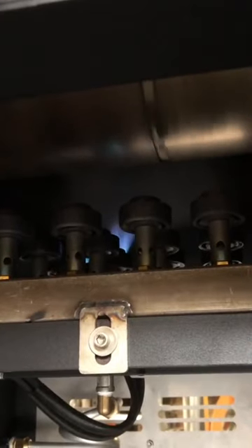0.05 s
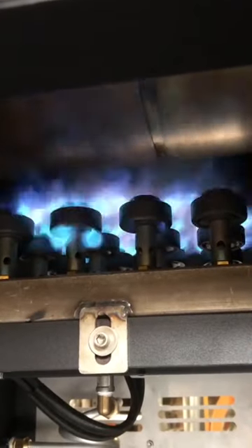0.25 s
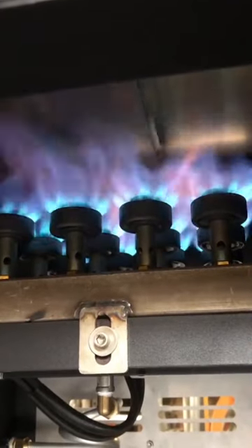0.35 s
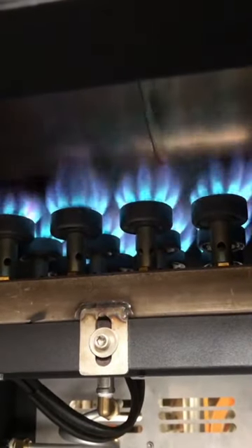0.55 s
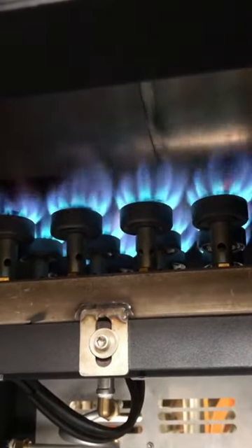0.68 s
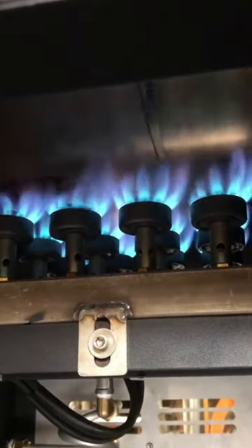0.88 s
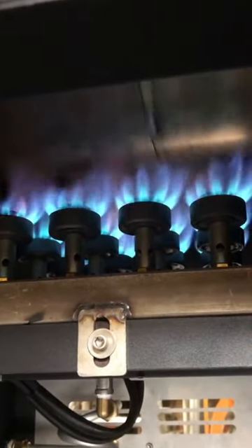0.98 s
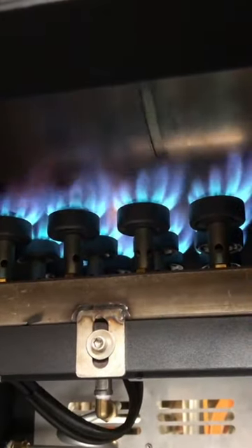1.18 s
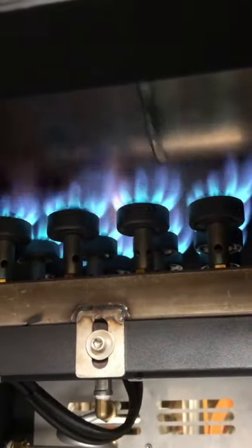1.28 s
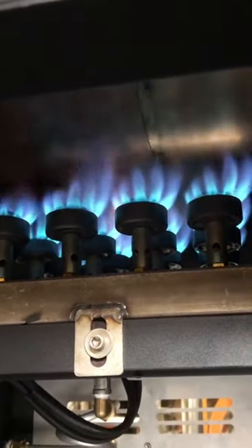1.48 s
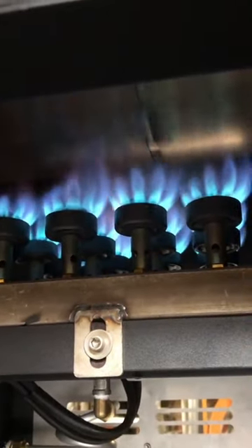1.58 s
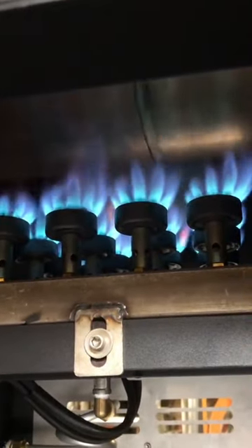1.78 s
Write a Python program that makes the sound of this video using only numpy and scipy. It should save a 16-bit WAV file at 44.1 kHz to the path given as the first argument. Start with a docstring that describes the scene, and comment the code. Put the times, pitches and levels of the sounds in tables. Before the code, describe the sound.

A row of gas burners lights: a hard metallic valve clack with quick chatter, a deep throbbing whoomp with a short hiss, then a fluttering low roar over a steady fan, heard close in a room.

```python
"""A gas valve clacks open in a sheet-metal housing: swelling, dying modes plus dying noise bursts.
A row of burners lights with a whoomp, a rough low throb and a short hiss, and settles to a low roar:
shaped noise boosted at the fire chamber's resonances.
A fan motor runs throughout: steady air noise and slightly unsteady tones."""
import sys
import numpy as np
from scipy import signal
from scipy.fft import rfft, irfft, next_fast_len
from scipy.io import wavfile
from scipy.ndimage import uniform_filter1d, map_coordinates

SR = 44100
rng = np.random.default_rng(int(sys.argv[2]) if len(sys.argv) > 2 else 0)


def store_wav(level_fs):
    """Save 16-bit WAV to argv[1]."""
    pcm = np.round(np.clip(np.atleast_2d(level_fs), -1, 1) * 32767)
    wavfile.write(sys.argv[1], SR, pcm.T.astype(np.int16))


N = 81585  # samples


def valve():
    """Each blow rings the plunger; the first also rings the panels, rattles the housing and echoes in the room."""
    # plunger strike and chatter: (time [s], level [dB])
    blows = [(.1996, 0), (.2085, -8), (.2275, -12), (.2405, -19)]
    # plunger modes: (frequency [Hz], peak before ring gain [dB], time to peak [s], T60 [s])
    plunger_modes = [(5222, -31, .002, .16), (5426, -21, .003, .045), (5590, -14, .003, .02),
                     (6500, -25, .003, .035), (7400, -32, .003, .05)]
    # sheet-metal panel modes: (frequency [Hz], peak before ring gain and onset [dB], time to peak [s], T60 [s])
    panel_modes = [(196, -27, .04, .12), (372, -33, .02, .1), (450, -35, .02, .1), (536, -24, .018, .14),
                   (612, -23.5, .024, .15), (654, -24.5, .022, .2), (765, -23, .009, .12),
                   (824, -24, .011, .16), (923, -17, .033, .035), (983, -23, .022, .1),
                   (1205, -21, .009, .13), (1279, -18, .038, .025), (1380, -18, .004, .09),
                   (1514, -23, .015, .08), (1608, -25, .02, .07), (1690, -25, .016, .1),
                   (1780, -24, .014, .08), (2507, -21, .013, .07), (2580, -42, .07, .2),
                   (2842, -39, .06, .17), (2880, -23, .005, .07), (3005, -38, .07, .14),
                   (3010, -20, .015, .04), (3450, -21, .003, .04), (3750, -23, .003, .035),
                   (5040, -49, .05, .25), (5380, -49, .05, .25), (5540, -47, .07, .2)]
    # rattle spectrum, shared by the room: (frequency [Hz], relative density [dB per Hz])
    rattle_spectrum = [(150, -49.5), (250, -28.5), (675, -3), (1300, 0.5), (2120, -12.5), (2470, -8.5),
                       (4310, -19), (5450, -9.5), (6030, -18), (6560, -13), (14000, -30)]
    # housing decay: (frequency [Hz], T60 [s])
    rattle_t60 = [(400, 0.18), (1200, 0.011), (3000, 0.16), (6000, 0.046), (12000, 0.091)]
    # room decay: (frequency [Hz], T60 [s])
    room_t60 = [(400, 1), (1500, 0.94), (5000, 0.44), (12000, 0.23)]
    rattle_db, room_db, onset_s = -13, -26.5, .002

    out = np.zeros(N)
    plunger = ringing(plunger_modes)
    for time_s, db in blows:
        out[round(time_s * SR):][:SR] += amp(db) * plunger
    rattle = amp(rattle_db) * dying(rattle_spectrum, rattle_t60)
    room = amp(room_db) * dying(rattle_spectrum, room_t60)
    onset = 1 - np.exp(-np.arange(SR) / SR / onset_s)
    clack = (ringing(panel_modes) + rattle + room) * onset
    out[round(blows[0][0] * SR):][:SR] += clack
    return out


def ringing(modes):
    """One second of modes, each swelling to its peak and dying away, wavering roughly in level and phase."""
    gain_db, waver_db, blur_rad, waver_hz = -2.5, 2.5, .9, 70
    t = np.arange(SR) / SR
    rate = np.log(1000)  # 60 dB
    out = 0
    for hz, db, peak_s, t60_s in modes:
        swell = (t / peak_s) ** (rate * peak_s / t60_s)
        decay = np.exp(-rate * (t - peak_s) / t60_s)
        phase = 2 * np.pi * (hz * t + rng.random()) + blur_rad * wobble(waver_hz)[:SR]
        gain = amp(db + gain_db + waver_db * wobble(waver_hz)[:SR])
        out = out + gain * swell * decay * np.sin(phase)
    return out


def dying(spectrum, t60):
    """A noise burst in which each frequency dies at its own speed; its first 10 ms have rms 1."""
    hz, t, z = signal.stft(rng.standard_normal(SR), SR, nperseg=128)
    decay_db = -60 * t / along(t60, hz)[:, None]
    z = z * amp(along(spectrum, hz)[:, None] + decay_db)
    burst = signal.istft(z, SR, nperseg=128)[1][:SR]
    return burst / np.std(burst[:SR // 100])


def lighting():
    """The gas catching: a rough low throb in the chamber that swells, holds and stops short, plus a hiss."""
    # throb partials: (multiple of the throb, level at full swell [dB rms], lag [s])
    partials = [(1, -29.5, 0), (2, -26.5, .015)]
    full_s, rise_s, hold_s, fall_s = .378, .012, .081, .028
    throb_hz, blur_rad, waver_db = 104.56, 1, .5
    t = np.arange(N) / SR
    throb = 0
    for multiple, db, lag_s in partials:
        early_s = np.minimum(t - full_s - lag_s, 0)
        late_s = np.maximum(t - full_s - hold_s, 0)
        swell = np.exp(-(early_s / rise_s) ** 2 - (late_s / fall_s) ** 2)
        phase = 2 * np.pi * (round(multiple) * throb_hz * t + rng.random()) + blur_rad * wobble(40.2)
        gain = np.sqrt(2) * amp(db + waver_db * wobble(42.95))
        throb = throb + gain * swell * np.sin(phase)
    return throb + puff()


def puff():
    """A brief hiss as the last burner catches: noise through one resonance, applied twice."""
    peak_s, length_s, peak_db = .422, .018, -47
    centre_hz, width_hz = 3600, 1200
    hiss = rush(lambda f: 1 / (1 + ((f - centre_hz) / (width_hz / 2)) ** 2), patchy_db=2.5)
    envelope = np.exp(-((np.arange(N) / SR - peak_s) / length_s) ** 2)
    return amp(peak_db) * envelope * hiss


def flames():
    """A fluttering low roar and the rush of the gas jets, both through the chamber's resonances."""
    # roar level: (time [s], level [dB])
    roar_level = [(.22, -51), (.27, -40), (.33, -29.5), (.38, -23.5), (.45, -25.5), (.49, -34.5),
                  (.53, -24.5), (.57, -31.5), (.61, -25), (.655, -32.5), (.72, -28.5), (.85, -30),
                  (1, -28.5), (1.15, -32), (1.26, -28.5), (1.42, -31.5), (1.57, -27), (1.66, -30.5),
                  (1.85, -33)]
    # roar spectrum before the chamber: (frequency [Hz], relative density [dB per Hz])
    roar_spectrum = [(25, -50), (50, -11), (80, 3.5), (150, -1.5), (185, -13), (310, -16.5), (400, -34),
                     (600, -62.5)]
    # jet level: (time [s], level [dB])
    jet_level = [(.24, -43), (.3, -47.5), (.39, -31.5), (.45, -39.5), (.53, -41.5), (.61, -34.5),
                 (.72, -38), (.85, -42), (1.3, -43.5), (1.6, -41), (1.85, -40)]
    # jet spectrum before the chamber: (frequency [Hz], relative density [dB per Hz])
    jet_spectrum = [(250, -35), (340, 3), (450, 0), (620, -5), (845, 0), (1030, -11.5), (1630, -4.5),
                    (1860, -17.5), (2020, -9), (2600, -14.5), (3300, -16.5), (4100, -24), (4850, -20.5),
                    (5600, -30.5), (7000, -41), (8900, -36.5), (10300, -63), (14000, -54)]
    # fire chamber resonances: (frequency [Hz], width [Hz], boost [dB])
    resonances = [(121, 68, 6.5), (211.8, 17.4, 18.5), (287.5, 60, 13), (495, 53.4, 14)]
    flutter_db, flutter_hz = .5, 16

    def chamber_db(f):
        return sum(db / (1 + ((f - hz) / (width_hz / 2)) ** 2) for hz, width_hz, db in resonances)

    roar = rush(lambda f: amp(along(roar_spectrum, f) + chamber_db(f)), patchy_db=1.24)
    roar = unit(roar * amp(flutter_db * wobble(flutter_hz)))
    jets = rush(lambda f: amp(along(jet_spectrum, f) + chamber_db(f)), patchy_db=-2.0)
    return level(roar_level) * roar + level(jet_level) * jets


def fan():
    """Steady air noise and motor tones slightly unsteady in level and phase."""
    # air noise spectrum: (frequency [Hz], relative density [dB per Hz])
    air_spectrum = [(30, -11), (86, 0.5), (223, -4.5), (254, 4), (354, -6.5), (495, -3.5), (563, -0.5),
                    (709, -14.5), (965, -9.5), (1310, -19.5), (1660, -15.5), (2090, -24), (2560, -20.5),
                    (3150, -33.5), (4900, -38), (6500, -47), (9800, -51), (11300, -59), (12000, -58),
                    (13000, -54), (14000, -51)]
    # motor tones: (frequency [Hz], level [dB rms])
    tones = [(393, -48.5), (1690, -67), (1820, -70.5), (1951, -57), (2565, -65), (12005, -83), (12035, -90)]
    air_db, waver_db, drift_rad = -38.5, .5, .9
    t = np.arange(N) / SR
    hum = 0
    for hz, db in tones:
        gain = np.sqrt(2) * amp(db + waver_db * wobble(5.75))
        hum = hum + gain * np.sin(2 * np.pi * hz * t + drift_rad * wobble(10.0))
    air = rush(lambda f: amp(along(air_spectrum, f)), patchy_db=1.0)
    return amp(air_db) * air + hum


def rush(response, patchy_db):
    """Coloured noise of rms 1 with time-frequency patches of random gain."""
    z = signal.stft(rng.standard_normal(N + 512), nperseg=512)[2]
    patches = uniform_filter1d(rng.standard_normal(z.shape), size=5, axis=0)  # over frequency
    patches = uniform_filter1d(patches, size=10, axis=1)  # over time
    noise = signal.istft(z * amp(patchy_db * unit(patches)), nperseg=512)[1][:N]
    return unit(filtered(noise, response))


def filtered(x, response):
    """x through a zero-phase gain given as a function of frequency in Hz."""
    m = next_fast_len(N + 8192)
    return irfft(rfft(x, m) * response(np.fft.rfftfreq(m, 1 / SR)), m)[..., :N]


def wobble(rate_hz):
    """A smooth random curve through rate_hz normal draws per second."""
    return map_coordinates(rng.standard_normal(400), [np.arange(N) * rate_hz / SR])


def level(points):
    """Gain per sample from (time [s], level [dB]) points."""
    time_s, db = np.transpose(points)
    return amp(np.interp(np.arange(N) / SR, time_s, db))


def along(points, hz):
    """(frequency [Hz], value) points interpolated on a log frequency axis."""
    f, value = np.transpose(points)
    return np.interp(np.log(hz + 1), np.log(f + 1), value)


def amp(db):
    """Amplitude ratio from dB."""
    return 10 ** (np.asarray(db) / 20)


def unit(x):
    """x scaled to rms 1."""
    return x / np.sqrt(np.mean(x ** 2) + 1e-20)


def scene():
    """Valve, lighting, flames and fan summed to one channel."""
    return (valve() + lighting() + flames() + fan())[None]


def record(dry):
    """The microphone rolls off the deep bass and keeps nothing above its band limit."""
    low_cut_hz, top_hz, top_edge_hz = 40, 13960, 80

    def microphone(hz):
        bass = hz ** 2 / (hz ** 2 + low_cut_hz ** 2)
        top = np.clip((top_hz - hz) / top_edge_hz + .5, 0, 1) ** 2
        return top * bass

    return filtered(dry, microphone)


dry = scene()
out = record(dry)
store_wav(out)
```